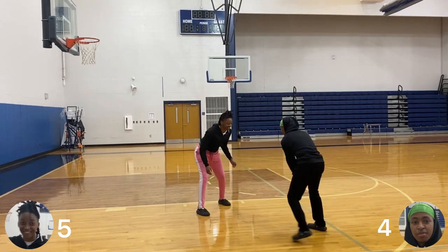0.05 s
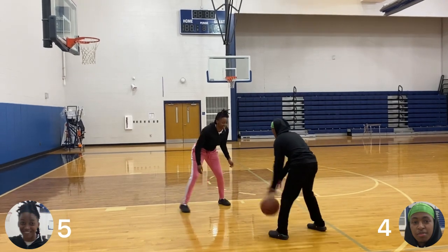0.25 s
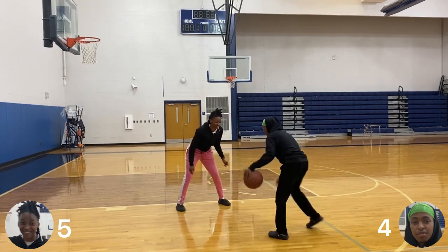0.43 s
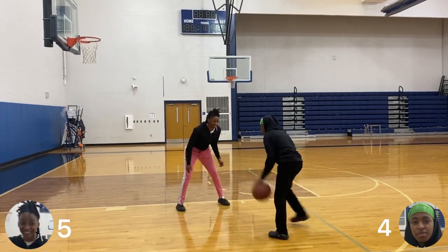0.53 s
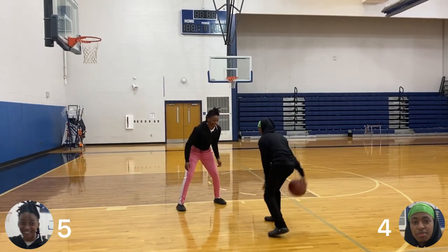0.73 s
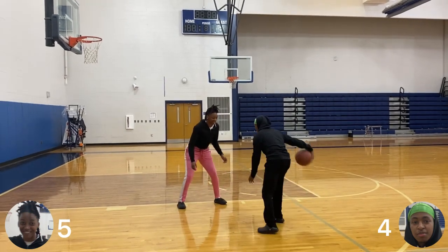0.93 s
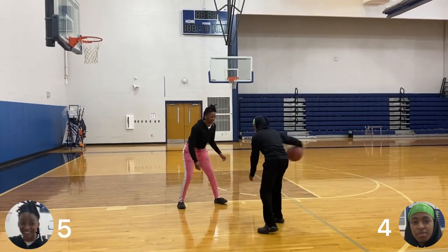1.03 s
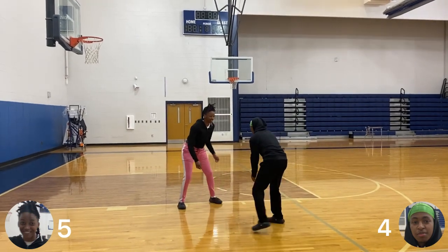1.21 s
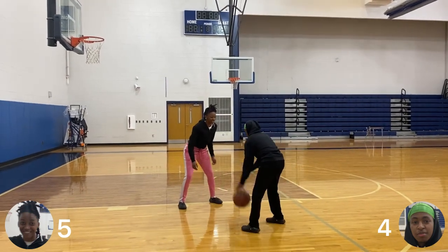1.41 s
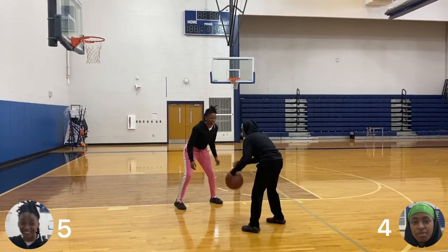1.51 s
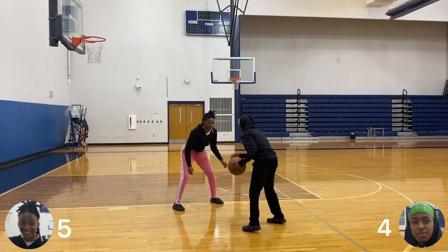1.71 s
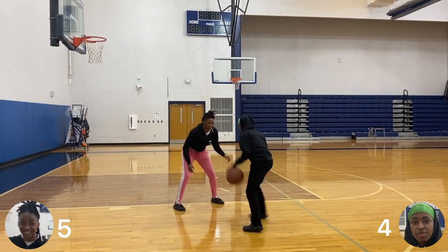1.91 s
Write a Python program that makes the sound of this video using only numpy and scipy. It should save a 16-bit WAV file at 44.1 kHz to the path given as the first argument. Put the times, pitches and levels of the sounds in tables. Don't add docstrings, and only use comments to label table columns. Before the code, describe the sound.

Uneven basketball dribbling on hardwood in a big reverberant gym, with faint shoe scuffs and ventilation hum.

```python
import sys
import numpy as np
from scipy import signal
from scipy.fft import rfft, irfft, next_fast_len
from scipy.io import wavfile

SR = 44100
rng = np.random.default_rng(int(sys.argv[2]) if len(sys.argv) > 2 else 0)


def int16_out(signal):
    q = np.round(np.clip(np.atleast_2d(signal).T, -1, 1) * 32767)
    wavfile.write(sys.argv[1], SR, q.astype(np.int16))


def decibels_to_gain(level_db):
    exponent = np.asarray(level_db, float) / 20
    return 10 ** exponent


N = 85995

# t/s, slap level/dB, dullness/(dB/octave), top air/dB, thud pitch ratio/1
BOUNCES = [
    (-.3, -60, 0, -4, 1.01),
    (0.2244, -3, -1.5, -7.5, 1),
    (0.639, -12, 5.5, 6, 0.943),
    (1.3571, -9.5, -0.9, 7, .99),
    (1.951, -31, 3, 3, 1.01),
]
# f/Hz, level/dB, t60/s
BALL_MODES = [(3670, 1.5, 0.0073), (4610, -4, 0.005), (5160, -17.5, 0.017), (6380, -7.5, 0.0039),
              (7930, -16.5, 0.014), (9900, -20, 0.00098), (12200, -31, 0.0061), (14150, -25, 0.0074),
              (15200, -26, .006)]
# f/Hz, level/dB, t60/s
SQUASHED_MODES = [
    [],
    [(1230, 1, .011), (1420, -8.5, 0.024), (2030, -1, 0.0087), (2590, -1, 0.014)],
    [(1150, 1.5, 0.012), (1550, -3.5, 0.0051), (2250, 4.5, 0.0047), (2800, -8, .006)],
    [(1170, 3, 0.022), (1520, 4.5, 0.011), (2170, -3, 0.0083), (2420, -1, 0.011)],
    [(1200, 1.5, .012), (2200, 1.5, .005)],
]
# thud/dB, soft start/(0-1), ring/dB, knock/dB, knock f/Hz
BOARDS = [
    (-60, .8, -26, -60, 480),
    (-2, 0.89, -24.5, -24.5, 430),
    (-5.5, 0.91, -30, -17.5, 345),
    (-4, 0.88, -20.5, -21, 420),
    (-8, .8, -26, -24, 480),
]
# f/Hz, level/dB, t60/s
BOARD_MODES = [(112.2, 2.5, 0.29), (127, 6, 0.35), (144.8, -13, 1), (200, -10, 0.13)]
# t/s, peak level/dB, left-right/dB, dullness/(dB/octave)
ECHOES = [(0.23, -34, 2, -7), (0.2436, -13.5, -7, 8), (0.25, -20.5, 4, -2), (0.3129, -27.5, -8, 2),
          (0.364, -31.5, 4, -9), (.425, -32, 6, -1), (0.457, -40.5, 0, 12), (0.395, -32.5, 3, 2.5),
          (0.646, -37, -10, -1), (0.6581, -28.5, -10, -1), (0.6652, -28, 6, -8), (0.688, -32.5, -6, -4.5),
          (0.8044, -35, -5.5, 10.5), (1.362, -24, 1, -5), (1.3753, -15, -7, -9), (1.382, -30, 5, -17),
          (1.4422, -30, 8, -2), (1.459, -42, -2, 0), (1.41, -46, 2, 0), (1.448, -35, 2, -15),
          (1.498, -36, 7, -1), (1.523, -32.5, 17, 2)]
# f/Hz, level/(dB per Hz)
BURST_COLOUR = [(800, -34), (1500, -13), (2300, 0), (4200, -4), (7500, -19), (9500, -32), (12000, -33),
                (16000, -40)]
# boom/dB, hiss/dB, hiss dullness/(dB/octave)
TAILS = [
    (-28.5, -42, 2.4),
    (-28, -38.5, 0.55),
    (-24, -39.5, 6),
    (-27.5, -40.5, 1.97),
    (-28, -48, .6),
]
# f/Hz, level/(dB per Hz)
BOOM_COLOUR = [(22, -71.5), (42, -33), (108, -4), (275, -16.5), (339, -22.5), (480, -23), (750, -44.5),
               (1200, -74)]
# f/Hz, level/(dB per Hz)
HISS_COLOUR = [(300, -37), (550, -4), (1700, -4), (2400, -3), (3000, -9), (4500, -9), (8500, -21),
               (16000, -59.5)]
# f/Hz, t60/s
GYM_DECAY = [(50, 2.9), (120, 2.95), (400, 2.41), (1200, 2.22), (3000, 2.63), (6000, 1.6), (12000, 0.83)]
# peak t/s, level/dB, f/Hz, length/s
BOOMS = [(.022, -29.5, 139, 0.013), (.1, -29.5, 97, 0.033), (0.138, -30.5, 67, 0.056),
         (.205, -30.5, 109, 0.024), (.248, -23.5, 102, 0.011), (0.357, -33, 69.5, 0.04),
         (.653, -26, 120, 0.016), (0.849, -40, 404, 0.06), (1.396, -27.5, 433, 0.0097),
         (1.429, -21, 131, 0.0068), (.283, -16, 139.5, 0.021), (.335, -27, 143, 0.013),
         (.385, -22, 102, 0.044), (.477, -19, 113, 0.013), (.679, -19, 197, 0.023),
         (.699, -14.5, 124, 0.026), (.73, -18, 123, 0.012), (.76, -24, 134, 0.017), (.8, -25.5, 112, .035),
         (.845, -24.5, 126.5, 0.015), (.892, -21, 121, 0.018), (1.045, -29.5, 125, 0.05),
         (1.386, -24, 129.5, 0.024), (1.412, -20.5, 151, 0.026), (1.487, -22.5, 152, 0.014),
         (1.515, -21, 108, 0.012), (1.67, -33.5, 110, 0.069)]
# t/s, level/dB, f/Hz, t60/s
TAPS = [
    (0.231, -19, 997, 0.026),
    (0.6467, -16.5, 1200, 0.015),
    (.6665, -15, 974, 0.019),
    (.694, -27.5, 907, 0.024),
    (.76, -34.5, 1048, 0.049),
    (1.2848, -36.5, 914, 0.029),
    (1.364, -23.5, 1136, 0.033),
    (1.94, -37.5, 1050, 0.031),
]
# t/s, length/s, level/dB
SCUFFS = [
    (0.028, 0.014, -74),
    (0.633, 0.043, -89),
    (0.77, 0.062, -58),
    (0.859, 0.078, -56.5),
    (0.947, 0.046, -64),
    (1.212, 0.12, -70),
    (1.308, 0.045, -66),
    (1.523, 0.22, -54),
    (1.94, 0.017, -61),
]
# f/Hz, level/(dB per Hz)
SCUFF_COLOUR = [(1500, -6), (4500, 5), (8000, -9.5), (11000, -23.5), (15000, -25), (16000, -37.5)]
# f/Hz, level/(dB per Hz)
AIR_COLOUR = [(20, -8), (35, -36.5), (56, 8.5), (120, -10), (330, -22.5), (1000, -38), (6000, -53),
              (12000, -74.5)]
# f/Hz, likeness/(0-1)
PORT_LIKENESS = [(60, 0.96), (150, 0.96), (380, 0.6), (950, 0.041), (2400, 0.035), (6000, 0.26),
                 (8600, 0.88), (15000, .995)]
# f/Hz, lead of left/rad
PORT_LEAD = [(0, 0), (7500, -.6), (8450, -2.9), (9550, -3.4), (11000, -6.3), (12450, -9.1), (13700, -9.75),
             (15500, -12.8)]
# f/Hz, left-right/dB
PORT_LEAN = [(60, -1), (180, -1.5), (550, 2.5), (1650, -2), (4970, 0.5), (8000, -0.8), (15000, -1)]
# f/Hz, level/dB
MIC_RESPONSE = [(8000, 1), (9300, 7), (10500, 5), (12300, 9), (13200, -2), (14800, 7.5), (15800, 3.5),
                (16800, -13)]

SNAP_S, RING_DB, HOLLOW_HZ = 0.00021, -13.5, 950
CRACK_S, CRACK_DB, DULL_TO_HZ, AIR_FROM_HZ = 0.013, -20, 6060, 10000
LEAD_IN_S, LEAD_IN_DB = 0.035, -31.5
CONTACT_S = .03
THUD_LAG_S, THUD_FROM_HZ, THUD_TO_HZ, GLIDE_S = 0.0023, 357.6, 79.6, 0.0065
SWELL_S, THUD_T60_S, KNOCK_T60_S, RING_RISE_S = 0.013, 0.13, 0.096, .035
BOOM_BUILD_S, BOOM_EARLY_DB = .075, 21.5
HISS_BUILD_S, HISS_EARLY_DB, EARLY_T60_S = 0.013, 1.5, 0.18
ECHO_HZ, ECHO_RING_DB = (1900, 2290), 1
SMEAR_S, SMEAR_S_PER_S = 0.0054, 0.15
TAP_TURN_RAD = 0.92
SAME_FROM_HZ = 8500
VENTILATION_DB = -39.5
HALF = np.array([[.5], [-.5]])


def unit(x):
    return x / np.sqrt(np.mean(x ** 2) + 1e-20)


def along(points, hz):
    f, v = np.transpose(points)
    return np.interp(np.log(hz + 1), np.log(f + 1), v)


def filtered(x, response):
    m = next_fast_len(x.shape[-1] + 8192)
    return irfft(rfft(x, m) * response(np.fft.rfftfreq(m, 1 / SR)), m)[..., :x.shape[-1]]


def add(track, sound, s):
    a = round(s * SR)
    part = sound[..., max(-a, 0):max(N - a, 0)]
    track[..., max(a, 0):max(a, 0) + part.shape[-1]] += part


def diffuse(gain, size):
    def mid_side(hz):
        turn = np.arccos(np.clip(along(PORT_LIKENESS, hz), 0, 1)) / 2
        return gain(hz) * [np.cos(turn), np.sin(turn)]
    mid, side = filtered(rng.standard_normal((2, size)), mid_side)
    return unit(np.array([mid + side, mid - side]))


def ball():
    out = np.zeros((2, N))
    for bounce, low_modes, wood, gym in zip(BOUNCES, SQUASHED_MODES, BOARDS, TAILS):
        s, slap_db, dull_db, air_db, ratio = bounce
        thud_db, soft, *board = wood
        boom_db, hiss_db, hiss_dull_db = gym
        add(out, decibels_to_gain(slap_db) * slap(dull_db, air_db, low_modes), s - CONTACT_S)
        add(out, decibels_to_gain(thud_db) * thud(soft, ratio) + boards(*board), s + THUD_LAG_S)
        boom = tail(BOOM_COLOUR, 0, BOOM_BUILD_S, BOOM_EARLY_DB)
        hiss = tail(HISS_COLOUR, hiss_dull_db, HISS_BUILD_S, HISS_EARLY_DB)
        add(out, decibels_to_gain(boom_db) * boom + decibels_to_gain(hiss_db) * hiss, s)
    for s, db, pan_db, dull_db in ECHOES:
        start, _, _, air_db, _ = max(b for b in BOUNCES if b[0] < s)
        level = decibels_to_gain(db - 4 + HALF * np.clip(pan_db, -4, 4))
        add(out, level * echo(s - start, dull_db, air_db), s + .0005)
    return out


def slap(dull_db, air_db, low_modes):
    t = np.arange(SR // 10) / SR - CONTACT_S
    after = np.maximum(t, 0)
    rise = np.exp(-(np.minimum(t, 0) / SNAP_S) ** 2)
    ring = 0
    for hz, db, t60 in low_modes + BALL_MODES:
        tilt_db = air_db * (hz > AIR_FROM_HZ) - dull_db * np.log2(min(hz, DULL_TO_HZ) / 2000)
        level = decibels_to_gain(db + rng.normal(0, 1, (2, 1)) + tilt_db - 60 * after / t60)
        ring = ring - level * np.cos(2 * np.pi * hz * t + rng.normal(0, .3, (2, 1)))
    hollow = signal.butter(2, HOLLOW_HZ, 'high', fs=SR, output='sos')
    ring = signal.sosfilt(hollow, rise * ring)
    lead_in = decibels_to_gain(LEAD_IN_DB) * burst(t - t[0], LEAD_IN_S, dull_db, air_db)[:, ::-1]
    lead_in = np.roll(lead_in, np.sum(t < 0), axis=1) * (t < 0)
    crack = decibels_to_gain(CRACK_DB) * burst(t, CRACK_S, dull_db, air_db)
    return decibels_to_gain(RING_DB) * ring + crack + lead_in


def burst(t, t60, dull_db, air_db):
    own = rng.standard_normal((2, len(t))) * .8
    shared = rng.standard_normal(len(t))
    noise = shared + filtered(own, lambda hz: hz < SAME_FROM_HZ)

    def colour(hz):
        dull = dull_db * np.log2(np.minimum(hz, DULL_TO_HZ) / 2000 + 0.14)
        return decibels_to_gain(along(BURST_COLOUR, hz) - dull + air_db * (hz > SAME_FROM_HZ))
    return unit(filtered(noise, colour)) * (t > 0) * decibels_to_gain(-60 * np.maximum(t, 0) / t60)


def thud(soft, ratio):
    t = np.arange(SR // 2) / SR
    glide = (THUD_FROM_HZ - THUD_TO_HZ) * GLIDE_S * (1 - np.exp(-t / GLIDE_S))
    cycles = THUD_TO_HZ * t + glide
    swell = 1 - np.clip(soft, 0, 1) * np.exp(-(t / SWELL_S) ** 2)
    fade = decibels_to_gain(-60 * t / THUD_T60_S - (t / 0.011) ** 2 * 2.75)
    return 2 * np.sin(2 * np.pi * ratio * cycles) * swell * fade


def boards(ring_db, knock_db, knock_hz):
    t = np.arange(SR // 2) / SR
    ring = sum(decibels_to_gain(db - 60 * t / t60) * np.sin(2 * np.pi * (hz * t + rng.random()))
               for hz, db, t60 in BOARD_MODES)
    ring = ring * (1 - np.exp(-(t / RING_RISE_S) ** 2))
    knock = sum(np.sin(2 * np.pi * r * knock_hz * t) for r in (.84, 1.01, 1.17))
    knock = decibels_to_gain(knock_db - 60 * t / KNOCK_T60_S) * knock * (1 - np.exp(-t / 0.012))
    return decibels_to_gain(ring_db) * ring + knock


def echo(travel_s, dull_db, air_db):
    t = np.arange(SR // 20) / SR
    t60 = SMEAR_S + SMEAR_S_PER_S * travel_s
    ring = sum(np.sin(2 * np.pi * (hz * rng.normal(1, 0.02) * t + rng.random((2, 1)) / 4)) for hz in ECHO_HZ)
    ring = decibels_to_gain(ECHO_RING_DB - 60 * t / t60 - 66 * travel_s) * ring
    rise = 1 - np.exp(-t / (.0003 + .008 * travel_s))
    return (ring + burst(t, t60, np.clip(dull_db, -3, 4), air_db)) * rise


def tail(spectrum, dull_db, build_s, early_db):
    colour = lambda hz: decibels_to_gain(along(spectrum, hz) - dull_db * np.log2(hz / 2000 + 0.049))
    hz, t, z = signal.stft(diffuse(colour, size=N + SR // 2), SR, nperseg=512)
    fade = decibels_to_gain(-60 * t / along(GYM_DECAY, hz)[:, None])
    early = 1 + decibels_to_gain(early_db - 60 * t / EARLY_T60_S)
    x = signal.istft(z * fade * early, SR, nperseg=512)[1]
    return x * (1 - np.exp(-(np.arange(x.shape[1]) / SR / build_s) ** 2))


def booms():
    t = np.arange(N) / SR
    out = np.zeros(N)
    for s, db, hz, length in BOOMS:
        out += decibels_to_gain(db) * np.exp(-(2 * (t - s) / length) ** 2) * np.cos(2 * np.pi * hz * (t - s))
    return out


def shoes():
    out, t = np.zeros((2, N)), np.arange(SR // 20) / SR
    rise = 1 - np.exp(-t / .0018)
    for s, db, hz, t60 in TAPS:
        knock = sum(k * np.sin(2 * np.pi * r * hz * t + TAP_TURN_RAD * HALF)
                    for r, k in [(.8, .5), (1, 1), (1.22, .6)])
        hiss = decibels_to_gain(db - 12) * burst(t, t60, 3, 0)
        add(out, (decibels_to_gain(db - 60 * t / t60) * knock + hiss) * rise, s)
    clock = np.arange(N) / SR
    drag = sum(decibels_to_gain(db) * np.exp(-(2 * (clock - s) / length) ** 2) for s, length, db in SCUFFS)
    return out + drag * diffuse(lambda hz: decibels_to_gain(along(SCUFF_COLOUR, hz)), size=N)


def ventilation():
    return decibels_to_gain(VENTILATION_DB) * diffuse(lambda hz: decibels_to_gain(along(AIR_COLOUR, hz)), size=N)


def scene():
    return ball() + booms() + shoes() + ventilation()


def low_pass(x):
    return signal.sosfilt(signal.butter(12, 16810, fs=SR, output="sos"), x)


def record(dry):
    def ports(hz):
        level = decibels_to_gain(along(MIC_RESPONSE, hz) + HALF * along(PORT_LEAN, hz))
        return level * np.exp(1j * HALF * np.interp(hz, *np.transpose(PORT_LEAD)))
    return low_pass(filtered(dry, ports))


dry = scene()
out = record(dry)
int16_out(out)
```